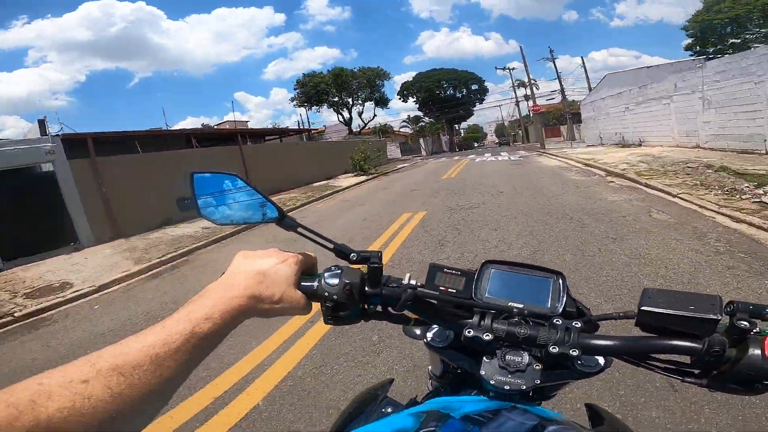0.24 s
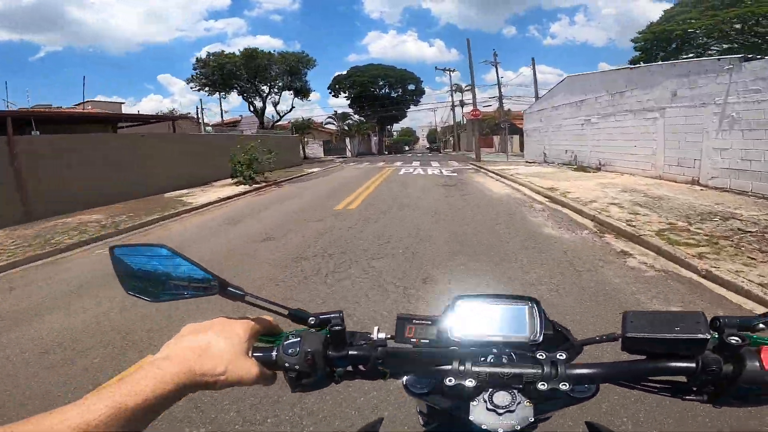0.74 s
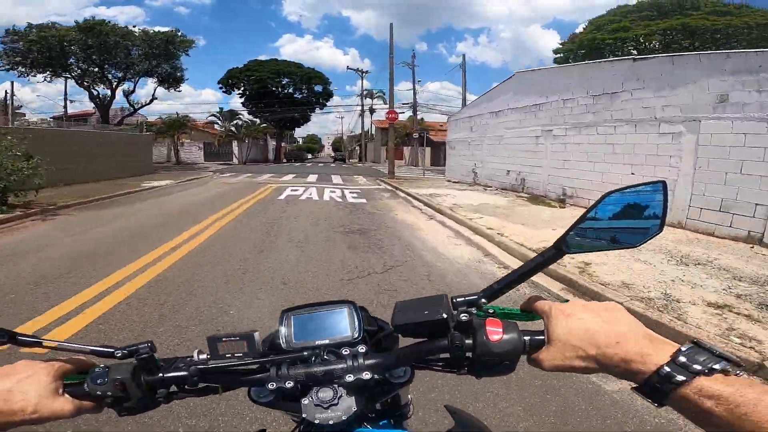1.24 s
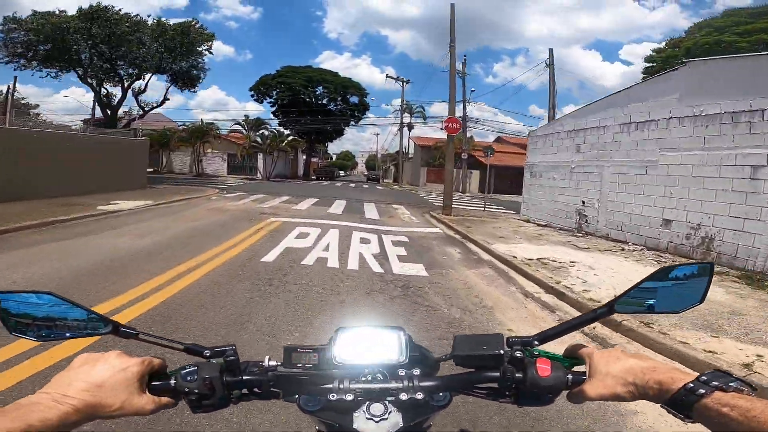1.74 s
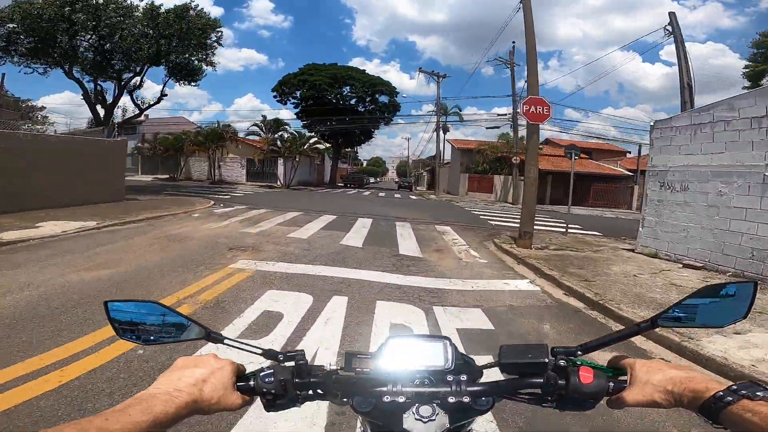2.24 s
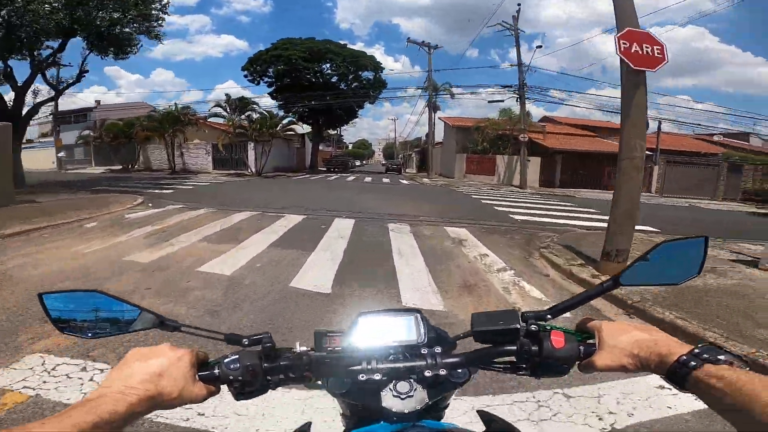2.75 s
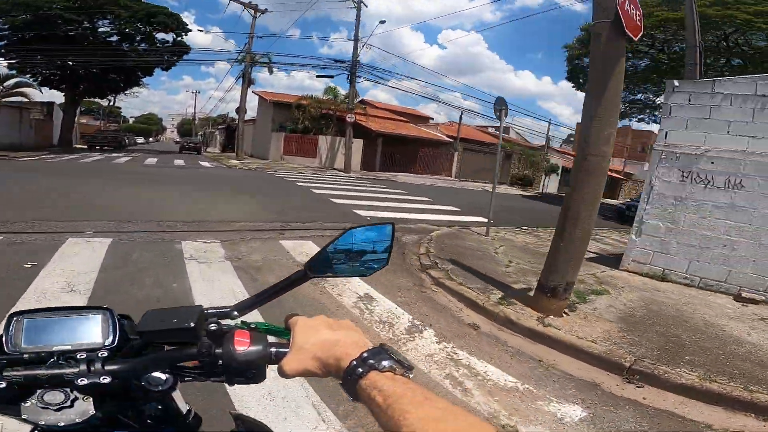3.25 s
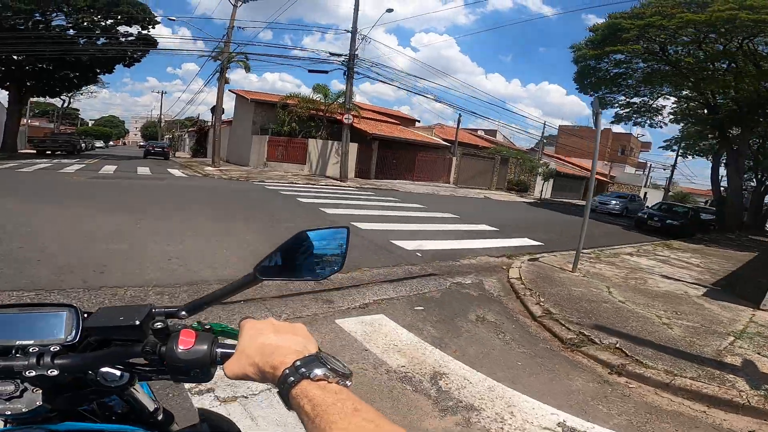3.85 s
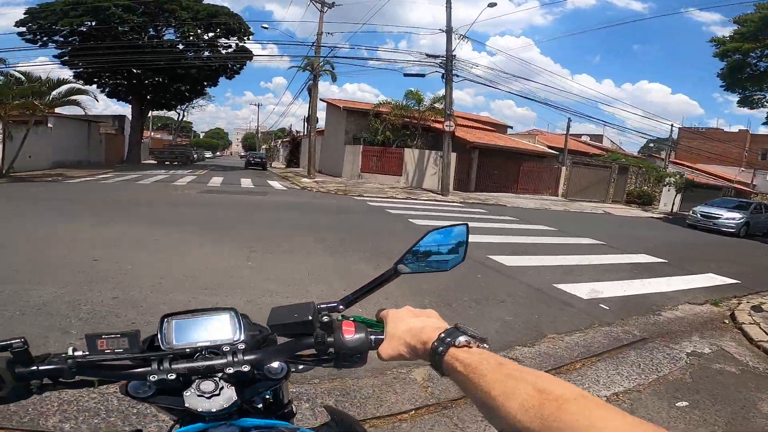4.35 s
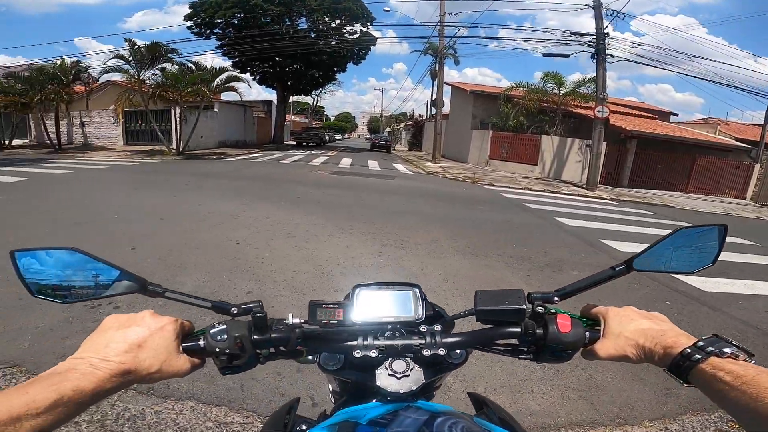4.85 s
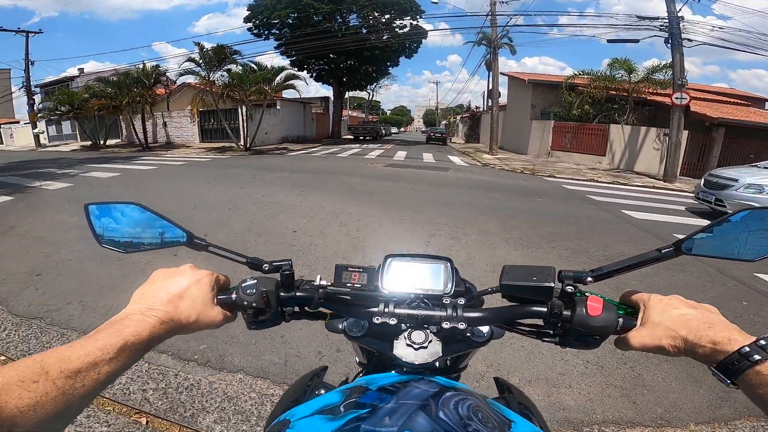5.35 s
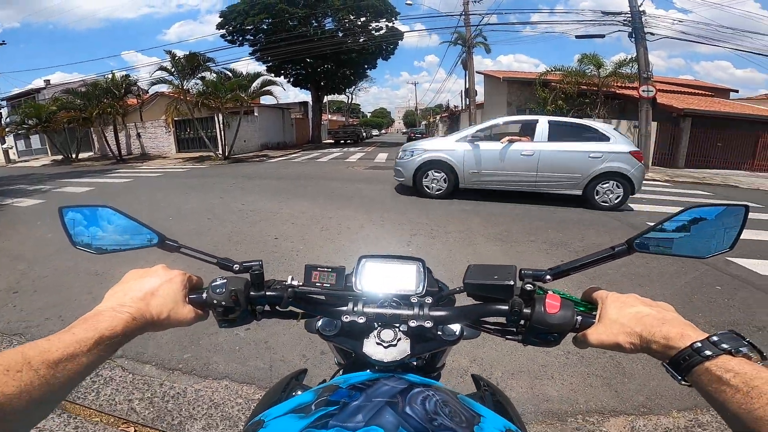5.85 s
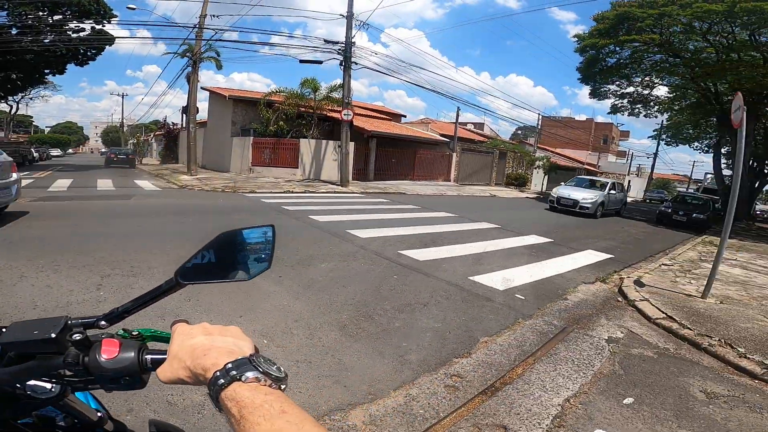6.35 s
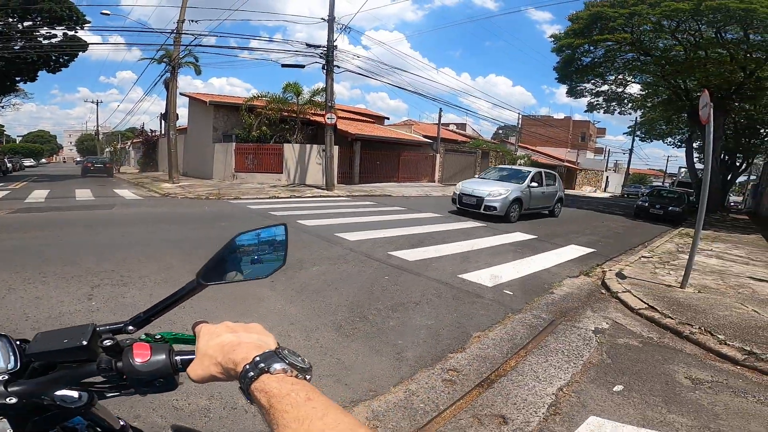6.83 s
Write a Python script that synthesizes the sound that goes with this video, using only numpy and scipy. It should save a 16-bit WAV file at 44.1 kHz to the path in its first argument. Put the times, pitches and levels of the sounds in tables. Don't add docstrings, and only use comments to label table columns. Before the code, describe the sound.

Heard close from the rider's helmet, a raspy motorcycle slows to a junction, brakes squeaking and rubbing, then idles unevenly with rattles and one hard clack.

```python
import sys
import numpy as np
from scipy import signal
from scipy.fft import rfft, irfft, next_fast_len
from scipy.io import wavfile
from scipy.ndimage import uniform_filter1d

SR = 44100
rng = np.random.default_rng(int(sys.argv[2]) if len(sys.argv) > 2 else 0)


def master(y):
    cut = np.clip(np.atleast_2d(y).T, -1, 1)
    pcm = np.round(cut * 32767)
    wavfile.write(sys.argv[1], SR, pcm.astype(np.int16))


def ratio(d):
    e = np.asarray(d, float) / 20
    return 10 ** e


N = 312669


def rms_one(x):
    return x / np.sqrt(np.mean(x ** 2) + 1e-20)


def in_time(rows):
    s, *columns = np.transpose(rows)
    return [np.interp(np.arange(N) / SR, s, c) for c in columns]


def evened(x, seconds=0.11):
    return x / np.sqrt(uniform_filter1d(x ** 2, int(seconds * SR)) + 1e-12)


def resonance(x, hz, width_hz):
    r = np.exp(-np.pi * width_hz / SR)
    zeros = np.array([1, 0, -1]) * (1 - r * r) / 2
    poles = [1, -2 * r * np.cos(2 * np.pi * hz / SR), r * r]
    return signal.lfilter(zeros, poles, x + 1e-18)


def coloured_noise(points):
    size = next_fast_len(N)
    hz, level_db = np.transpose(points)
    bins_hz = np.arange(1, size // 2 + 2) * SR / size
    shape = ratio(np.interp(np.log(bins_hz), np.log(hz), level_db, left=-120))
    return rms_one(irfft(rfft(rng.standard_normal(size)) * shape, size)[:N])


def wander(rate):
    return np.interp(np.arange(N) / SR * rate, np.arange(200), rng.standard_normal(200))


def per_firing(turns, values):
    return np.interp(turns, np.arange(len(values)), values)


def strokes(rows, attack_s, release_s):
    t = np.arange(N) / SR
    gain = 0
    for s, hold, db in rows:
        swell = (t - s) / attack_s
        fade = 1 + (s + attack_s + hold - t) / release_s
        gain = gain + ratio(db) * np.clip(np.minimum(swell, fade), 0, 1) ** 2
    return gain


# (time [s], load [0-1])
CLUTCH_LOAD = [(0, .85), (.29, .85), (.33, .62), (.38, .86), (1.4, .86), (1.47, .08), (2.1, .6), (2.5, .7),
               (2.75, .48), (3.45, .45), (3.75, .12), (7.09, .08)]
GRIP_FROM, GRIP_FULL = .7, .88


def grip():
    load, = in_time(CLUTCH_LOAD)
    return np.clip((load - GRIP_FROM) / (GRIP_FULL - GRIP_FROM), 0, 1)


def unevenness():
    free, gripped = .95, .22
    return free + (gripped - free) * grip()


# (time [s], level [dB])
GAS_FLOW = [(0, 16), (.04, 14.5), (.11, 2), (.18, 2.5), (.24, 7), (.34, 4), (.58, 4), (.7, 7.5),
            (1.29, 6.5), (1.42, 0), (1.9, 3.5), (2.5, 5), (3.2, 1.3), (4.7, 0.3), (5.3, 2.5), (7.09, 2.5)]
# (time [s], length [s], level [dB])
PIPE_BARKS = [
    (0.032, 0.035, -3),
    (0.067, 0.04, 10),
    (0.118, 0.087, -9),
    (0.258, 0.044, -1),
    (0.317, 0.043, 6),
    (0.342, 0.049, -8),
    (1.363, 0.21, 3),
]
THUMP_DB, LOW_DB, HIGH_DB, HISS_DB = -12.5, -25, -15, -39.5
CLUTCH_S, DROP_S, RECOVER_S = 1.366, 0.16, 0.38
OVERRUN_END_S = 0.334


def levels(rate):
    t = np.arange(N) / SR
    (flow_db,), (load,), held = in_time(GAS_FLOW), in_time(CLUTCH_LOAD), grip()
    recovery = np.exp(-np.maximum(t - CLUTCH_S - DROP_S, 0) / RECOVER_S)
    drop = np.clip((t - CLUTCH_S) / DROP_S, 0, 1) * recovery
    bark_db = sum(db * np.exp(-(2 * (t - s) / length) ** 2) for s, length, db in PIPE_BARKS)
    loud_db = np.maximum(bark_db, 0)
    boom_db = 1.0 * np.minimum(rate - 86, 0.67) * np.sqrt(held)
    overrun = np.clip((OVERRUN_END_S - t) / 0.018, 0, 1)
    thump_db = THUMP_DB + .9 * held - 1 * drop - .5 * loud_db
    low_db = LOW_DB + 8 * load + boom_db + 2 * overrun - 3 * drop - 1.1 * loud_db
    high_db = HIGH_DB - 9.5 * drop + bark_db - 2.5 * overrun
    hiss_db = HISS_DB + flow_db - 4 * drop
    return thump_db, low_db, high_db, hiss_db


FIRING_STRENGTH = [0.1, 1.0, -1.6, -1.5, -.4, 1.2, .2, -2.8]
FIRING_RING = [2, 2.5, -5, -3, .5, 1.5, -.5, -2.5]
FIRING_EARLY = [-.04, -.055, .09, .12, -.015, -.055, -.06, .02]


def firings(rate, uneven):
    chance = rng.standard_normal((700, 2))
    chance -= uniform_filter1d(chance, size=7, axis=0)
    even_turns = np.cumsum(rate) / SR + .44
    burn_db = np.resize(FIRING_STRENGTH, 700) + 1.02 * chance[:, 0]
    strength_db = uneven * per_firing(even_turns, burn_db)
    blow_db = np.resize(FIRING_RING, 700) + 1.2 * chance[:, 0]
    ring_db = uneven * per_firing(even_turns + 1, blow_db)
    early = uneven * per_firing(even_turns, np.resize(FIRING_EARLY, 700))
    jitter = uneven * per_firing(even_turns, 0.03 * chance[:, 1])
    turns = np.maximum.accumulate(even_turns + jitter + 0.32 * early)
    return even_turns, turns, early, strength_db, ring_db


def firing_thump(turns, early, strength_db):
    return evened(ratio(strength_db) * np.sin(2 * np.pi * (turns + .75 * early + .18)))


def pipe(turns, uneven, strength_db, modes, own_db, turbulence):
    at = np.flatnonzero(np.diff(np.floor(turns))) + 1
    puff = np.exp(-3.0 * (turns % 1)) * ratio(strength_db) * (0.94 + .5 * uneven)
    chance = rng.standard_normal((700, len(modes)))
    chance = uniform_filter1d(chance, size=2, axis=0)[:len(at)]
    out = np.zeros(N)
    for k, (hz, width_hz, level_db) in enumerate(modes):
        blows = turbulence * puff * rng.standard_normal(N)
        blows[at] += ratio(strength_db[at] + own_db * uneven[at] * chance[:, k])
        ringing = resonance(resonance(blows, hz, width_hz), hz, 2.5 * width_hz)
        out += (-1) ** k * ratio(level_db) * ringing / width_hz ** .75
    return evened(out)


# (delay [s], level [dB])
WALL_ECHOES = [
    (.021, -38),
    (.037, -32.5),
    (0.057, -9.5),
]


def street(x):
    out = x.copy()
    for delay, level_db in WALL_ECHOES:
        lag = int(delay * SR)
        out[lag:] += ratio(level_db) * x[:-lag]
    return ratio(0.22) * out


def clean_tone(turns, rate, multiples, modes):
    out = np.zeros(N)
    for k, phase in zip(multiples, rng.random(len(multiples))):
        power = 0
        for hz, width_hz, level_db in modes:
            power = power + ratio(2 * level_db) / (1 + (2 * (k * rate - hz) / width_hz) ** 2) ** 2
        out += np.sqrt(power) * ratio(.8 * wander(9.0)) * np.sin(2 * np.pi * (k * turns + phase))
    return evened(out, 0.15)


# (frequency [Hz], width [Hz], level [dB])
VALVE_GEAR = [(1213, 140, 4), (1393, 90, 6.5), (1641, 38, -2), (2780, 380, -7.5), (4030, 79, -23),
              (5140, 350, -20.5), (6500, 1600, -6.5), (9000, 900, -12), (11400, 1700, -30)]


def clatter(turns):
    sizes = ratio(2.0 * np.minimum(rng.exponential(1, N), 3)) * rng.choice([-1, 1], N)
    born = rng.random(N) < 4000 * np.exp(-3.0 * (turns % 1)) / SR
    dealt = rng.integers(0, len(VALVE_GEAR), N)
    out = np.zeros(N)
    for k, (hz, width_hz, level_db) in enumerate(VALVE_GEAR):
        patches = ratio(2.2 * wander(2.5))
        ringing = resonance(sizes * born * (dealt == k), hz, width_hz)
        out += ratio(level_db) * patches * rms_one(ringing)
    return rms_one(out)


# (time [s], firing rate [1/s])
ENGINE_SPEED = [(0, 108), (.065, 107), (.13, 89), (.17, 86.5), (.28, 87), (.34, 75.6), (.6, 77.3),
                (1.22, 85), (1.42, 83), (1.52, 75.5), (1.75, 74.5), (2.05, 70.8), (2.35, 70.3),
                (2.62, 74.5), (2.87, 77.2), (3.35, 78.5), (3.8, 79.5), (7.09, 79.95)]
# (frequency [Hz], width [Hz], level [dB])
LOW_PIPE_MODES = [(150, 45, -6), (244, 24, 0), (300, 45, -7)]
HIGH_PIPE_MODES = [(400, 26, -10), (476, 34, 0), (530, 34, -8), (590, 40, -14), (648, 26, -9),
                   (730, 50, -14), (812, 30, -7), (862, 34, -10), (960, 120, -19)]
# (frequency [Hz], width [Hz], level [dB])
LOADED_LOW_MODES = [(148, 34, -7), (240, 60, -7), (268, 24, 2), (290, 28, 1), (322, 16, -7), (336, 16, -8)]
LOADED_HIGH_MODES = [(352, 16, -12), (386, 16, -5), (425, 18, -2), (460, 40, -3), (490, 55, 0),
                     (540, 50, -12), (570, 20, -15), (636, 16, -12), (684, 16, -11), (730, 100, -25),
                     (840, 45, -11), (905, 40, -15)]
# (frequency [Hz], level [dB/Hz])
HISS_SPECTRUM = [(590, 2.5), (1000, 0), (1130, -5), (1600, -11.5), (2280, -24), (2770, -19), (3370, -26.5),
                 (4000, -25), (4440, -27.5), (5210, -25.5), (6780, -28.5), (7520, -28), (15500, -42.5)]


def engine():
    rate, = in_time(ENGINE_SPEED)
    thump_db, low_db, high_db, hiss_db = levels(rate)
    uneven = unevenness()
    clean, = in_time(CLUTCH_LOAD)
    even_turns, turns, early, strength_db, ring_db = firings(rate, uneven)
    thump = firing_thump(turns, early, strength_db)

    low = pipe(turns, uneven, .5 * ring_db, LOW_PIPE_MODES, own_db=4.5, turbulence=.13)
    high = pipe(turns, uneven, ring_db, HIGH_PIPE_MODES, own_db=2.5, turbulence=0.074)
    rough = street(ratio(low_db) * low + ratio(high_db) * high)
    tone = ratio(low_db) * clean_tone(even_turns, rate, range(2, 5), LOADED_LOW_MODES)
    tone += ratio(high_db) * clean_tone(even_turns, rate, range(5, 13), LOADED_HIGH_MODES)
    tone *= ratio(.9 * ring_db)
    exhaust = np.sqrt(1 - clean) * rough + np.sqrt(clean) * tone

    gate = evened((4.4 + np.exp(-4.0 * (turns % 1))) * ratio(0.34 * ring_db))
    hiss = gate * coloured_noise(HISS_SPECTRUM) + ratio(-7.5) * clatter(turns)
    return ratio(thump_db) * thump + exhaust + ratio(hiss_db + 4) * hiss + loose_parts(gate)


def frame_rumble():
    rumble = coloured_noise([(8, -15), (25, -1), (40, -5.0), (55, 7.0), (115, 4.5), (150, 5.5),
                             (220, -20.5), (400, -55)])
    shaking = 0.18 + 1.62 * unevenness()
    return ratio(-29.5) * shaking * rumble


# (frequency [Hz], level [dB/Hz])
RUB_SPECTRUM = [(2000, -35), (3500, -8.5), (5300, -10.5), (5900, -5), (8000, -5.5), (10000, -12.5),
                (13500, -25), (15500, -24)]
# (time [s], hold [s], level [dB])
PAD_BITES = [
    (1.62, 0.1, -49),
    (2.97, 0.13, -42),
    (3.17, 0.1, -47.5),
    (3.36, 0.12, -46),
    (3.66, 0.008, -50),
    (4.55, 0.027, -51),
    (4.96, 0.094, -47.5),
    (5.17, 0.14, -49),
]


def brake_rub():
    drag = ratio(-57)
    return (drag + strokes(PAD_BITES, attack_s=0.08, release_s=0.11)) * coloured_noise(RUB_SPECTRUM)


# (time of peak [s], pitch [Hz], glide [Hz/s], level [dB], rise [dB/s])
BRAKE_SQUEALS = [
    (.535, 7500, 2000, -45, 90),
    (.965, 6200, 0, -46, 250),
    (1.1, 6540, -300, -29.5, 800),
    (1.287, 4860, 0, -43, 800),
]


def brake_squeal():
    t = np.arange(N) / SR
    slow = signal.butter(2, 120, fs=SR, output="sos")
    hoarse = rms_one(signal.sosfilt(slow, rng.standard_normal(N)))
    chop = (1 + 0.7 * np.sin(2 * np.pi * 42 * t)) * (1 + .8 * hoarse)
    out = np.zeros(N)
    for s, hz, glide, db, rise in BRAKE_SQUEALS:
        age = t - s
        fall_db = 350 * age
        level_db = db - np.where(age < 0, (rise * age) ** 2 / 20 - rise * age, fall_db)
        out += chop * ratio(level_db) * np.sin(2 * np.pi * (hz * age + glide * age ** 2 / 2))
    return out


# (time [s], hold [s], level [dB], pitch
# [Hz])
BUZZING_PARTS = [
    (0.658, 0.15, -49.5, 3570),
    (1.95, .5, -51, 3130),
    (.66, 0.49, -42, 1700),
    (3.02, 0.13, -49, 2430),
    (3.301, 1.3, -54.5, 2720),
    (5.45, 1.1, -43.5, 1580),
    (6.28, 1.2, -49.5, 2720),
]


def loose_parts(gate):
    white = rng.standard_normal(N)
    out = np.zeros(N)
    for s, hold, db, hz in BUZZING_PARTS:
        swell = strokes([(s, hold, db)], attack_s=0.041, release_s=.2)
        out += swell * rms_one(resonance(white, hz, .08 * hz))
    return gate ** 1.2 * out


def burst(s, level_db, t60, noise):
    age = np.arange(N) / SR - s
    return ratio(level_db - 60 * np.clip(age, 0, 1) / t60) * (age >= 0) * noise


# (time [s], peak level [dB], pitch [Hz])
BRIGHT_TICKS = [
    (1.6211, -36, 7930),
    (1.6605, -33, 7850),
    (2.1543, -30, 7480),
    (2.2097, -38, 7280),
    (2.2247, -42, 7550),
    (2.2676, -46, 8780),
    (2.3808, -42, 7770),
    (2.4367, -40, 8100),
]
# (time [s], peak level [dB], pitch [Hz])
METAL_TICKS = [(1.6605, -28, 7850), (1.9433, -32, 8270), (1.9927, -26.5, 3730), (2.0725, -34, 5810),
               (2.098, -26, 7390), (2.1533, -29, 5130), (2.2097, -26, 3890), (3.917, -26, 4080),
               (4.1663, -31, 3710), (4.3289, -27.5, 5260), (5.5706, -26, 6030), (5.763, -13.5, 3950),
               (5.8225, -36, 3940), (6.024, -34, 5030), (6.25, -24, 5100), (6.2884, -26, 5330),
               (6.3264, -24, 5300), (6.5738, -32, 5280), (6.6726, -39, 4080), (6.7738, -39, 4100),
               (6.929, -30, 4100)]


def metal_ticks():
    white = rng.standard_normal(N)
    out = np.zeros(N)
    for rows, t60_s in ((METAL_TICKS, .03), (BRIGHT_TICKS, .015)):
        for s, db, hz in rows:
            out += burst(s, db - 12.5, t60_s, rms_one(resonance(white, hz, 1500)))
    return out


# (time [s], peak level [dB], t60 [s])
LEVER_KNOCKS = [
    (1.995, -27, 0.061),
    (2.008, -30, .03),
    (2.03, -20, .03),
    (2.075, -34, .03),
    (5.7666, -15.5, 0.089),
    (5.8242, -23.5, 0.042),
    (6.324, -36, 0.044),
    (6.36, -27, .04),
]


def lever_knocks():
    broad = coloured_noise([(900, 4), (1800, 3), (4000, -8.5), (5500, -4.0), (8000, -9), (15000, -39)])
    return sum(burst(s, db - 12, t60, broad) for s, db, t60 in LEVER_KNOCKS)


def scene():
    machine = engine() + frame_rumble()
    brakes = brake_rub() + brake_squeal()
    small_metal = metal_ticks() + lever_knocks()
    return (machine + brakes + small_metal)[None]


def low_pass(x):
    return signal.sosfilt(signal.butter(12, 15620, fs=SR, output="sos"), x)


def record(dry):
    rounded = 1.337 * np.tanh(dry / 1.456)
    dulled = signal.sosfilt(signal.butter(4, 14800, fs=SR, output="sos"), rounded)
    dulled *= np.clip((N - np.arange(N)) / (.004 * SR), 0, 1)
    return low_pass(dulled)


dry = scene()
out = record(dry)
master(out)
```